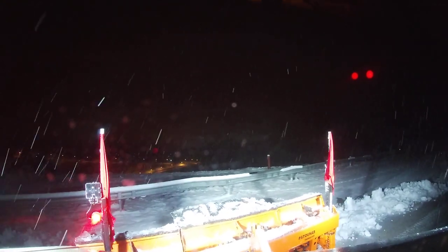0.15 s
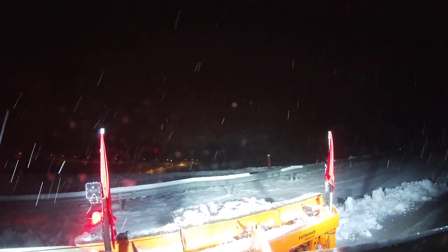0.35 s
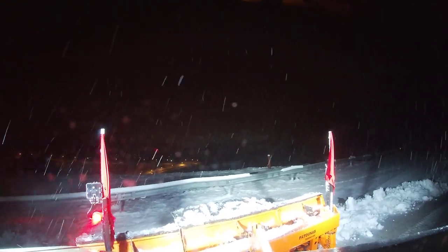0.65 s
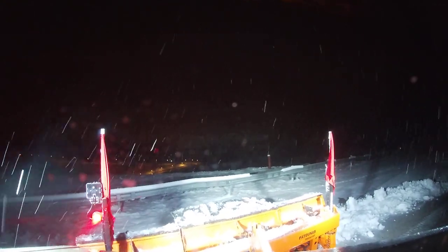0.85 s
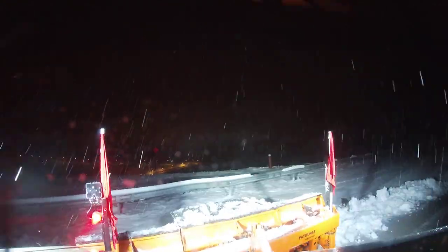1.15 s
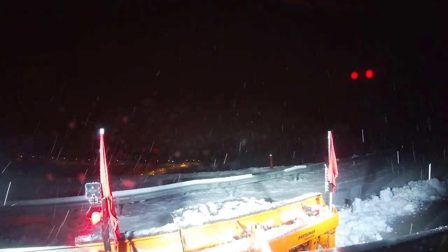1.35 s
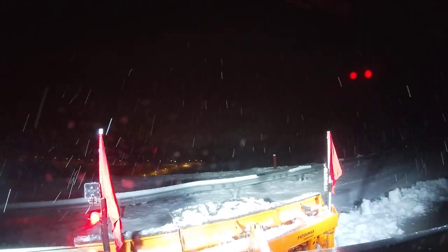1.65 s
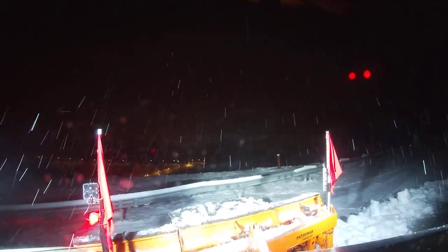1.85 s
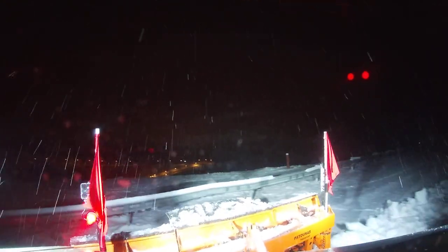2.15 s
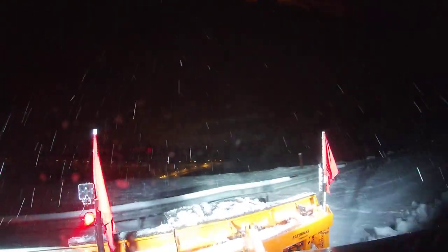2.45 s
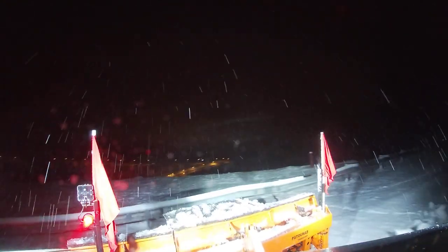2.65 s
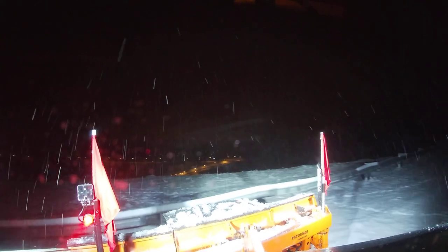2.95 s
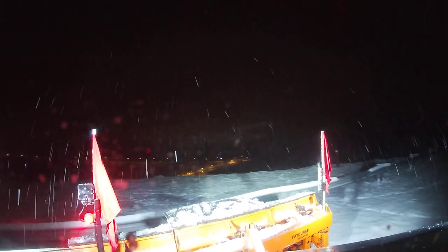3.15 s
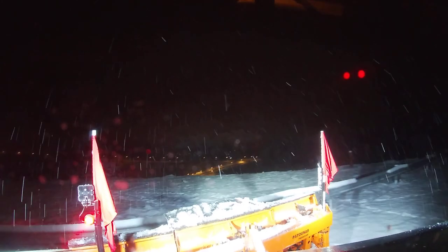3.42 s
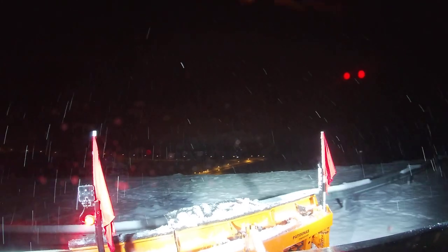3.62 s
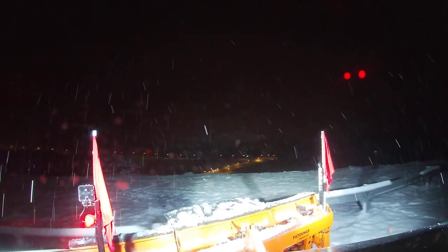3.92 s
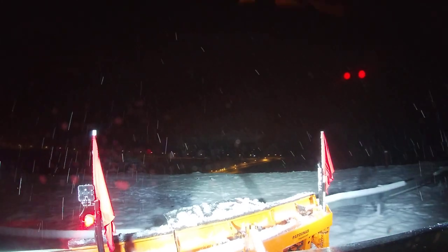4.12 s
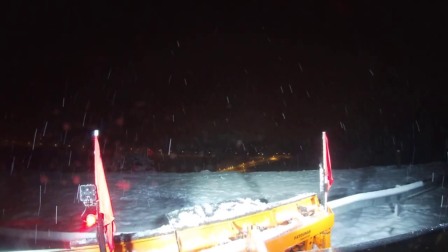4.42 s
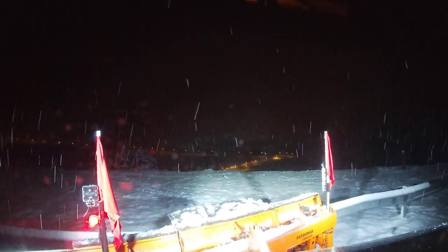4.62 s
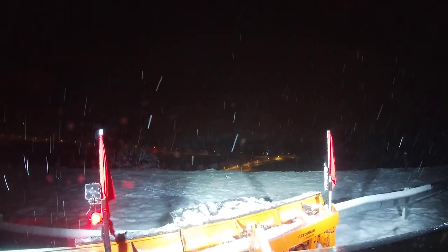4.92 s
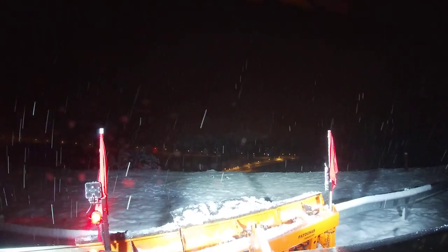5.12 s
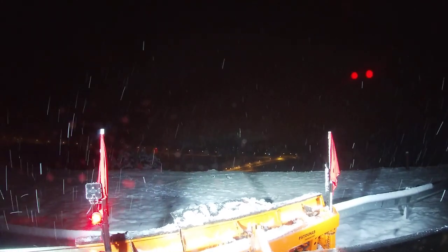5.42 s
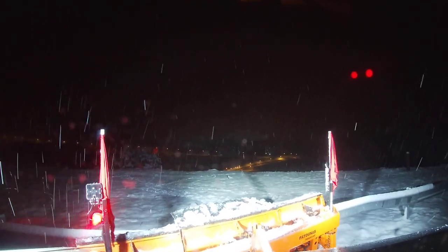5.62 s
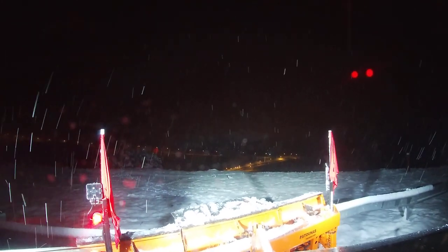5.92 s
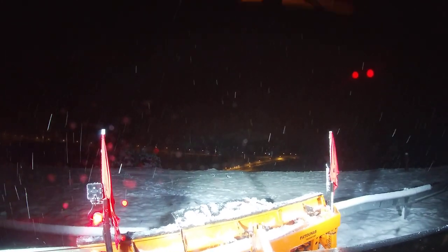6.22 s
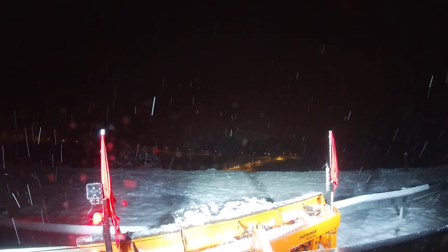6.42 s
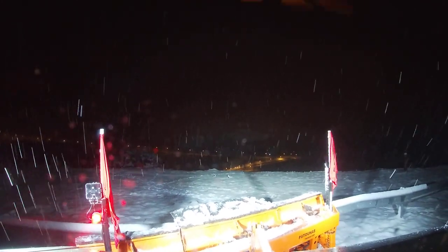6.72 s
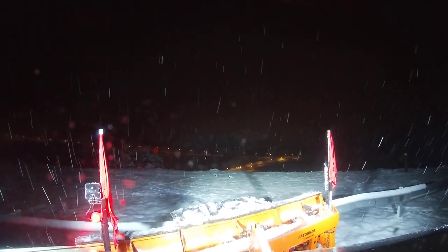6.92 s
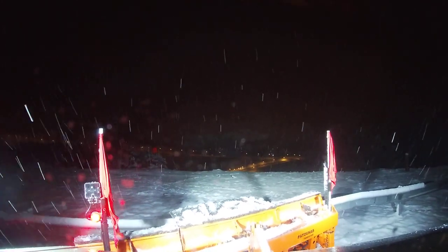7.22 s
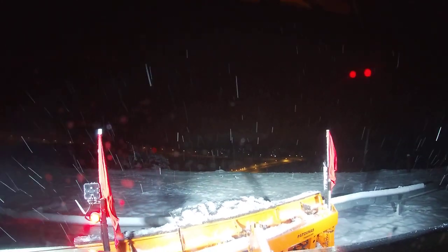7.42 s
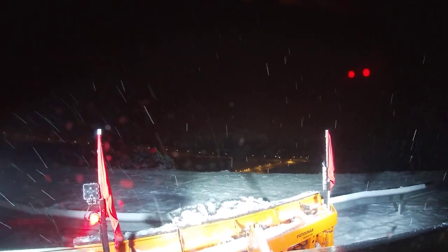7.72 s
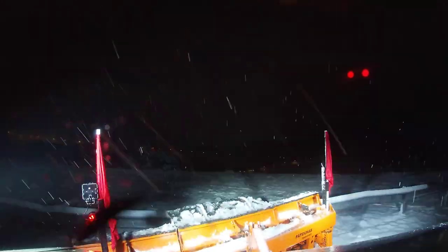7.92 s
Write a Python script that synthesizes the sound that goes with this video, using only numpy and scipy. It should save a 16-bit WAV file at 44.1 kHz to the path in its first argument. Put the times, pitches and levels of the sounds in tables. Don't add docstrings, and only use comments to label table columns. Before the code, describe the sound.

Inside the cab of a plow truck pushing snow, a diesel's deep boom dominates throughout, backed by muffled roar, low hum, wheel rumble and a thin icy scrape. The engine sags, then a hard cluster of blade knocks lands at 0.6-0.8 seconds with loose steel jangle and low chassis thuds. It revs up around 1-1.2, with a thin whistle and short groan, then drops; a falling squeal sounds at 1.35. A soft second knock and thud come at 2.1 as revs climb again, with quick trim ticks near 2.4. The pitch falls by 2.7 and stays lower until a surge at 4.6, with faint chirps. Around 5 the boom falters and the chassis judders. A loud rising chirp comes at 5.6, short blips at 6.2. Engine speed slowly declines; at 7.2 a sharp falling chirp joins rapid ticks, before a final rev toward 8.

```python
import sys
import numpy as np
from scipy import signal
from scipy.io import wavfile
from scipy.ndimage import uniform_filter1d

SR = 44100
rng = np.random.default_rng(int(sys.argv[2]) if len(sys.argv) > 2 else 0)


def nominal_scale(level):
    x = np.asarray(level, float) / 20
    return 10 ** x


def materialize(psi):
    bounded = np.clip(np.atleast_2d(psi).T, -1, 1)
    quanta = np.round(bounded * 32767).astype(np.int16)
    wavfile.write(sys.argv[1], SR, quanta)


N = 355887


def evened(x):
    return x / np.sqrt(np.mean(x ** 2) + 1e-20)


def curve(rows, t):
    s, value = np.transpose(rows)
    return np.interp(t, s, value)


def swells(rows, t):
    total_db = 0
    for centre_s, half_length_s, level_db in rows:
        angle = np.pi / 2 * np.clip((t - centre_s) / half_length_s, -1, 1)
        total_db = total_db + level_db * np.cos(angle) ** 2
    return total_db


def drift(n, span):
    once = uniform_filter1d(rng.standard_normal(n), int(span))
    return evened(uniform_filter1d(once, int(span)))


def add(mix, start_s, sound):
    part = mix[round(start_s * SR):][:len(sound)]
    part += sound[:len(part)]


def resonate(x, hz, width_hz):
    turn = np.exp(2j * np.pi * hz * np.arange(len(x)) / SR)
    r = np.exp(-np.pi * width_hz / SR)
    return 2 * (turn * signal.lfilter([1 - r], [1, -r], x / turn)).real


def body(x, modes):
    out = 0
    for hz, width_hz, level_db in modes:
        steep = resonate(resonate(x, hz, width_hz), hz, width_hz)
        out = out + nominal_scale(level_db) * evened(steep)
    return out


def noise(colour, patchy_db, size):
    frames, hz = 4 * N // size + 5, np.fft.rfftfreq(size, 1 / SR)
    a, b, patches = rng.standard_normal((frames, len(hz), 3)).T
    patches = evened(uniform_filter1d(uniform_filter1d(patches, 12, 0), 12, 1))
    colour_hz, colour_db = np.transpose(colour)
    level_db = np.interp(np.log(hz + 1), np.log(colour_hz + 1), colour_db)
    z = (a + 1j * b) * nominal_scale(level_db[:, None] + patchy_db * patches)
    return evened(signal.istft(z, nperseg=size, noverlap=3 * size // 4)[1][:N])


# time_s, level_db
BLADE_LOAD = [(0, 1), (.25, -0.5), (.5, 2.5), (.72, -1), (1.0, 2), (1.2, -4), (1.4, -3.5), (1.95, -1),
              (2.35, -2), (2.6, -5), (2.95, -1), (3.55, 0), (4.45, 0), (4.8, -1.5), (5.4, 2), (6.25, 0),
              (6.85, 2), (8.07, -1.5)]


def blade_load_db(t):
    return curve(BLADE_LOAD, t)


# time_s, firing_rate_hz
ENGINE_SPEED = [(0, 38.2), (.47, 37.2), (.84, 31.8), (1.03, 46), (1.21, 50.5), (1.8, 27.5), (2.04, 27.2),
                (2.25, 41.5), (2.53, 47), (2.7, 32.3), (3.15, 36.3), (3.5, 33), (4.27, 30.9), (4.62, 44.5),
                (5.0, 44.3), (5.45, 40.3), (7.45, 32.6), (8.07, 42.3)]
FLYWHEEL_S = .09


def firing_rate(t):
    return uniform_filter1d(curve(ENGINE_SPEED, t), int(FLYWHEEL_S * SR), mode="nearest")


# firing_multiple, level_db
FIRING_ORDERS = [(3, -43), (4, -43), (5, -46), (6, -47)]
# centre_s, half_length_s, level_db
BOOM_FALTERS = [(.57, 0.054, -5), (.66, 0.096, -6), (1.24, .04, -9), (1.31, 0.063, -7), (1.45, 0.17, -2.5),
                (1.77, .11, -14), (2.13, 0.029, -8), (2.62, 0.11, -8.5), (2.8, 0.22, -2.5),
                (3.35, 0.17, -6.5), (3.9, .3, -3.5), (4.4, 0.046, -2.5), (4.7, 0.032, -19), (4.79, .03, -6),
                (4.97, 0.025, -28), (5.0, 0.65, -4), (5.14, 0.025, -14), (5.23, 0.048, -7), (5.7, .1, -2.5),
                (6.6, 0.38, -3), (8.0, 0.066, -3)]
# centre_s, half_length_s, level_db
OCTAVE_HUMPS = [(0, 0.4, 4), (.65, .15, -11), (1.35, 0.31, -5), (1.8, 0.11, 7.5), (2.65, 0.11, -2.5),
                (3.9, 0.6, 4), (6.05, .2, -6), (6.7, 0.23, 4.5), (7.35, 0.32, -7)]
BOOM_DB, OCTAVE_DB = -12, -26
OCTAVE_DB_PER_HZ, OCTAVE_DB_PER_CLIMB = -0.25, -0.1866


def firing_boom(t, rate_hz, phase):
    climb_hz_per_s = np.maximum(np.gradient(rate_hz) * SR, 0)
    boom_db = BOOM_DB + swells(BOOM_FALTERS, t) + 1.3 * drift(N, 860) + .9 * drift(N, 2500)
    octave_db = OCTAVE_DB + OCTAVE_DB_PER_HZ * (rate_hz - 35) + OCTAVE_DB_PER_CLIMB * climb_hz_per_s
    octave_db = octave_db + swells(OCTAVE_HUMPS, t) + 0.5 * drift(N, 1400)
    out = nominal_scale(boom_db) * np.cos(phase) + nominal_scale(octave_db) * np.cos(2 * phase + 1.1)
    for multiple, level_db in FIRING_ORDERS:
        level = nominal_scale(level_db + 2.5 * drift(N, 1900))
        out += level * np.cos(round(multiple) * phase + 6.96 * rng.random())
    return np.sqrt(2) * out


# crank_multiple, level_db at the cab air's pitch
CRANK_ORDERS = [(9, -29), (10, -29), (11, -40), (12, -27.5)]
# crank_multiple, centre_s, half_length_s, level_db
HUM_HUMPS = [(10, .8, .4, -7), (12, .9, .4, -7), (12, 3.0, .55, -10), (12, 4.0, .3, 2), (9, 4.75, .4, 3),
             (10, 5.95, .45, 5), (10, 6.75, .45, -10), (12, 6.6, .45, 9), (12, 7.45, .2, 1),
             (10, 7.9, .3, -6)]
CAB_HZ, CAB_WIDTH_HZ, HUM_DB_PER_LOAD_DB = 130, 13, .6


def cab_hum(t, rate_hz):
    crank_hz = rate_hz / 3
    crank_phase = 2 * np.pi * np.cumsum(crank_hz) / SR
    load_db = blade_load_db(t)
    out = np.zeros(N)
    for multiple, level_db in CRANK_ORDERS:
        k = round(multiple)
        near = 1 / (1 + ((k * crank_hz - CAB_HZ) / CAB_WIDTH_HZ) ** 2)
        humps = [row[1:] for row in HUM_HUMPS if round(row[0]) == k]
        hum_db = level_db + HUM_DB_PER_LOAD_DB * load_db + swells(humps, t) + 2.2 * drift(N, 2400)
        out += nominal_scale(hum_db) * near * np.cos(k * crank_phase + 6.3 * rng.random())
    return np.sqrt(2) * out


# pitch_hz, density_db
ROAR_SPECTRUM = [(120, -44), (200, 1), (290, -3), (445, -6.5), (700, -11.5), (1640, -18.5), (2500, -25),
                 (3200, -24), (4300, -33.5), (5800, -37.5), (6800, -55), (9000, -68.5), (12800, -78),
                 (14500, -110)]
# pitch_hz, width_hz, level_db
CAB_PANELS = [(170, 33, -39), (291.2, 56, -41.5), (555.5, 83, -45), (1222, 50, -55), (3370, 140, -78),
              (5570, 100, -79.5)]
ROAR_DB = -34.5


def roar(t, phase):
    roar_db = ROAR_DB + blade_load_db(t)
    throb = 1 + 0.053 * np.cos(phase)
    wash = nominal_scale(roar_db + 1.56) * throb * noise(ROAR_SPECTRUM, 0.72, size=1024)
    panels = nominal_scale(roar_db + 38.0) * body(rng.standard_normal(N), CAB_PANELS)
    return wash + panels


# pitch_hz, density_db
RUMBLE_SPECTRUM = [(8, -40.5), (18, -5), (30, -27), (55, -1), (90, -0.5), (130, -7.5), (190, -23.5),
                   (260, -18.5), (500, -55.5), (2000, -120)]
# centre_s, half_length_s, level_db
WHEEL_LUMPS = [(.2, 0.17, 1), (.66, 0.25, 9), (1.1, 0.18, 2.5), (2.6, 0.24, -14.5), (4.1, 0.85, 3.5),
               (5.42, 0.34, 1), (6.0, .15, -4.5), (6.37, 0.29, 2), (6.85, 0.17, 4)]
RUMBLE_DB = -28


def wheel_rumble(t):
    floor = noise(RUMBLE_SPECTRUM, 1.5, size=4096)
    air = nominal_scale(-10) * body(rng.standard_normal(N), [(129, 20, 0)])
    return nominal_scale(RUMBLE_DB + swells(WHEEL_LUMPS, t)) * (floor + air)


# pitch_hz, density_db
SCRAPE_SPECTRUM = [(1000, -33.5), (2500, -15), (4000, -10), (5600, -1), (6500, -13), (8000, -17.5),
                   (10000, -21), (12800, -34.5), (15000, -67.5)]
# centre_s, half_length_s, level_db
BLADE_BITES = [(.05, 0.42, 8), (.5, 0.1, 13), (.66, 0.087, -9), (1.05, 0.3, 5.5), (1.16, 0.047, 9.5),
               (1.27, 0.092, -3), (1.9, 0.25, 8.5), (2.4, 0.15, 10), (3.3, 0.27, -9), (3.51, .05, 14),
               (3.8, 0.51, -7.5), (4.55, 0.31, 4), (5.6, .2, 8), (7.3, .2, 4)]
SCRAPE_DB, SCRAPE_DB_PER_LOAD_DB = -66, 1.2


def blade_scrape(t):
    level_db = SCRAPE_DB + SCRAPE_DB_PER_LOAD_DB * blade_load_db(t) + swells(BLADE_BITES, t)
    return nominal_scale(level_db + 2.4 * drift(N, 1600)) * noise(SCRAPE_SPECTRUM, 1.4, size=256)


# pitch_hz, width_hz, level_db
SPRING_MODE = [(26.6, 9.3, -38)]
# centre_s, half_length_s, level_db
JUDDER_HUMPS = [
    (.75, .2, 4.5),
    (3.4, .2, 3.5),
    (5.0, 0.8, 10.5),
    (6.6, 0.3, 5.5),
]


def chassis_judder(t):
    return nominal_scale(swells(JUDDER_HUMPS, t)) * body(rng.standard_normal(N), SPRING_MODE)


def blow(level_db, t60_s, modes):
    t = np.arange(int(SR * .15)) / SR
    ring = body(rng.standard_normal(2 * len(t)), modes)[len(t):]
    attack = np.minimum(t / .0006, 1)
    burst = nominal_scale(level_db - 60 * t / t60_s) * attack * ring
    return signal.sosfilt(signal.butter(8, 12500, fs=SR, output="sos"), burst)


# start_s, level_db, t60_s, jangle_db
BLADE_KNOCKS = [
    (.5965, -14, .08, -43),
    (.610, -21, .1, -44),
    (.642, -18.5, .1, -51),
    (.653, -21, .09, -46),
    (.715, -29, .12, -64),
    (2.13, -37, .12, -68),
    (.68, -27, .25, -62),
    (.79, -29, .2, -70),
]
# pitch_hz, width_hz, level_db
BLADE_FRAME = [(95, 40, -10), (200, 90, -3), (370, 180, 1), (590, 240, -2), (850, 250, -11),
               (1500, 600, -19)]
# pitch_hz, width_hz, level_db
LOOSE_STEEL = [(2780, 1800, 3.5), (3660, 150, 0.5), (4510, 680, 2), (5440, 470, 2.5), (6540, 830, -18.5),
               (10300, 2500, -38.5)]


def knocks(mix):
    for start_s, level_db, t60_s, jangle_db in BLADE_KNOCKS:
        add(mix, start_s, blow(level_db - 4, t60_s, BLADE_FRAME) + blow(jangle_db, t60_s, LOOSE_STEEL))


# start_s, level_db
CHASSIS_THUDS = [
    (.597, -20.5),
    (0.643, -25.5),
    (0.713, -20.5),
    (2.125, -27),
]
# pitch_hz, width_hz, level_db
CHASSIS_MODES = [(60, 16, -4.5), (102, 80, -1.5), (151, 70, 0.5), (227, 70, -9)]
THUD_T60_S = 0.3


def thuds(mix):
    for start_s, level_db in CHASSIS_THUDS:
        add(mix, start_s, blow(level_db, THUD_T60_S, CHASSIS_MODES))


# peak_s, level_db
TRIM_TICKS = [(0.95, -46), (1.1387, -57.5), (1.1747, -56), (1.4656, -48.5), (1.929, -52.5), (2.338, -53.5),
              (2.363, -52), (2.3855, -53.5), (2.4072, -49), (2.4294, -57.5), (2.4544, -53.5),
              (2.6514, -60.5), (3.493, -57.5), (3.5129, -50), (7.1841, -61.5), (7.216, -45), (7.2449, -52),
              (7.2749, -49.5), (7.3053, -52), (7.3362, -44.5), (7.3664, -71), (7.4694, -54.5),
              (7.4849, -46), (7.5138, -54), (7.5737, -50), (7.6031, -46), (7.8037, -55.5)]
# pitch_hz, width_hz, level_db
TRIM_MODES = [(2900, 500, 4), (4800, 2500, 6), (7500, 2500, -4), (10200, 600, -5), (11800, 1500, -17)]
TICK_T60_S = 0.029


def ticks(mix):
    for peak_s, level_db in TRIM_TICKS:
        add(mix, peak_s - .001, blow(level_db - 5.0, TICK_T60_S, TRIM_MODES))


RISE_S, RISE_PER_HOLD = 0.0068, .25
FALL_DB_PER_S, FALL_PER_HOLD, DEPTH_DB = 1201, 0.35, 27.5


def squeak(full_s, held_s, pitch_hz, glide_hz_per_s, level_db, partials_db, rough):
    rise_s = RISE_S + RISE_PER_HOLD * held_s
    fall_s = DEPTH_DB / FALL_DB_PER_S + FALL_PER_HOLD * held_s
    t = np.arange(-rise_s, held_s + fall_s, 1 / SR)
    off_peak = np.maximum(np.maximum(-t / rise_s, (t - held_s) / fall_s), 0)
    envelope_db = level_db - DEPTH_DB * off_peak
    hz = (pitch_hz + glide_hz_per_s * t) * (1 + .004 * rough * drift(len(t), 80))
    phase = 2 * np.pi * np.cumsum(hz) / SR
    tone = np.zeros(len(t))
    for k, partial_db in enumerate(partials_db):
        late_db = k * DEPTH_DB * np.minimum(t / rise_s, 0)
        waver_db = 2.2 * rough * drift(len(t), 120)
        tone += nominal_scale(envelope_db + partial_db + late_db + waver_db) * np.sin((k + 1) * phase)
    return full_s - rise_s, np.sqrt(2) * tone * signal.windows.tukey(len(t), .15)


# full_s, held_s, pitch_hz, glide_hz_per_s, level_db
JOINT_WHISTLES = [(.952, .04, 10400, 2500, -55), (.953, .025, 13570, -1000, -71),
                  (1.34, .025, 13950, 1000, -85), (2.018, .004, 14304, 1000, -70),
                  (4.978, .004, 15690, 0, -78), (5.066, .012, 15690, 0, -54), (5.11, .06, 15680, 300, -77),
                  (5.695, .02, 14750, -1000, -82), (6.002, .01, 13800, -500, -79),
                  (8.062, .02, 9900, 0, -66)]
JOINT_GROANS = [
    (1.05, .015, 1222, -150, -49),
    (1.09, .05, 1214, -150, -50),
]
JOINT_SQUEALS = [
    (1.338, 0.047, 5050, -1400, -33.5),
    (1.432, .01, 4910, -1500, -48),
]
JOINT_CHIRPS = [
    (4.522, 0.0083, 4360, -6000, -46.5),
    (5.632, 0.034, 4320, 4303, -27),
    (6.203, .002, 4520, -3000, -35),
    (6.221, 0.0034, 4450, -1500, -46.5),
    (7.216, 0.0027, 4650, -10000, -28.5),
    (7.241, .004, 4500, 2000, -43),
]
JOINT_THIN_CHIRPS = [
    (4.577, .004, 3950, -15000, -45),
    (5.695, .022, 9230, 1500, -53),
]
SQUEAL_PARTIALS = [-1, -33]
CHIRP_PARTIALS = [-1.5, -26, -45]


def joint_squeaks(mix):
    joints = [(JOINT_WHISTLES, [0], .7), (JOINT_GROANS, [0, 0], 2.), (JOINT_SQUEALS, SQUEAL_PARTIALS, .3),
              (JOINT_CHIRPS, CHIRP_PARTIALS, 1.5), (JOINT_THIN_CHIRPS, [0], 1.5)]
    for rows, partials_db, rough in joints:
        for row in rows:
            add(mix, *squeak(*row, partials_db, rough))


def scene():
    t = np.arange(N) / SR
    rate_hz = firing_rate(t)
    uneven_hz = rate_hz * (1 + 0.01 * drift(N, 828))
    phase = 2 * np.pi * np.cumsum(uneven_hz) / SR
    mix = firing_boom(t, rate_hz, phase) + cab_hum(t, rate_hz)
    mix += roar(t, phase) + wheel_rumble(t) + blade_scrape(t) + chassis_judder(t)
    knocks(mix)
    thuds(mix)
    ticks(mix)
    joint_squeaks(mix)
    return mix[None]


def band_limit(x):
    return signal.sosfilt(signal.butter(12, 15900, fs=SR, output="sos"), x)


def record(dry):
    limited = 0.75 * np.tanh(dry / 0.85) - .002
    ends = signal.windows.tukey(N, .0006)
    return band_limit(ends * limited)


dry = scene()
out = record(dry)
materialize(out)
```